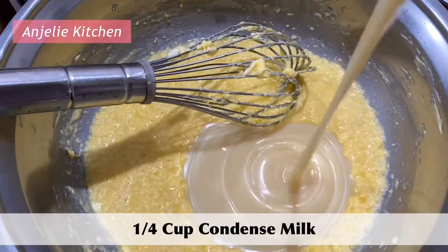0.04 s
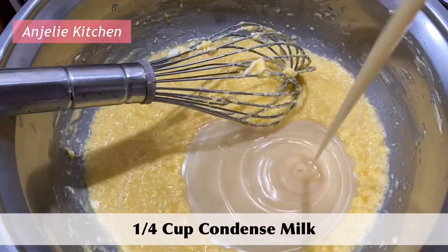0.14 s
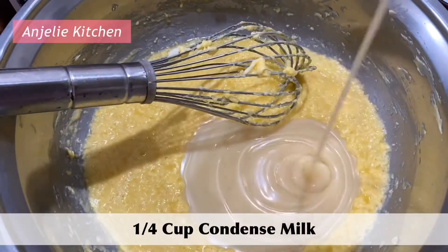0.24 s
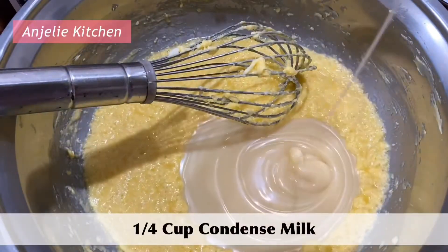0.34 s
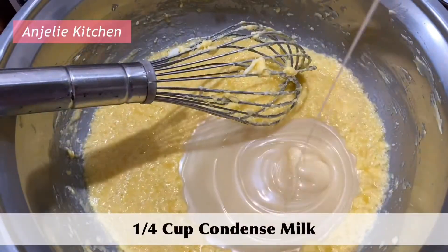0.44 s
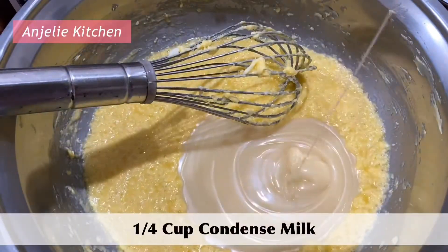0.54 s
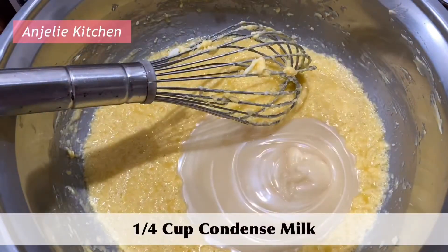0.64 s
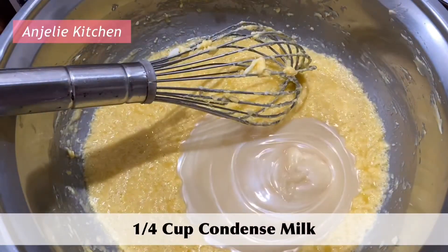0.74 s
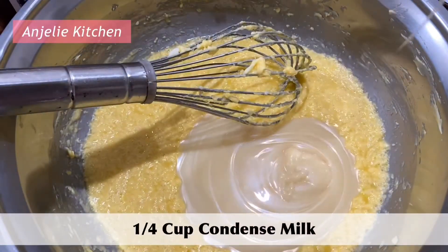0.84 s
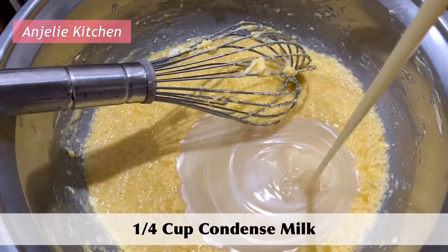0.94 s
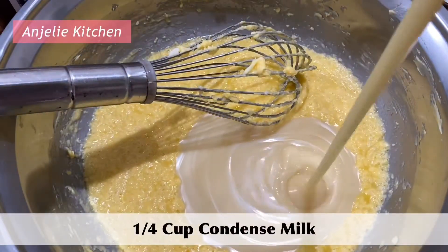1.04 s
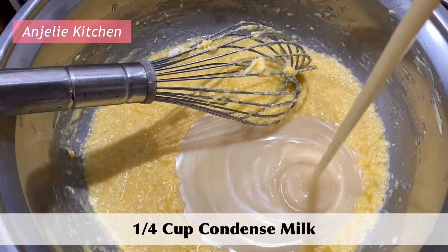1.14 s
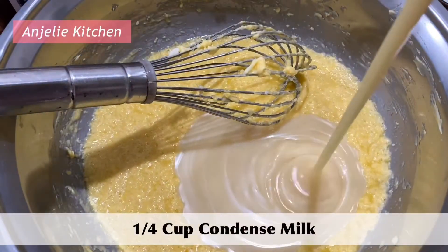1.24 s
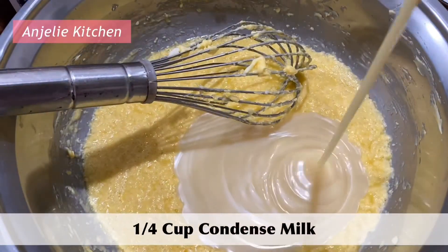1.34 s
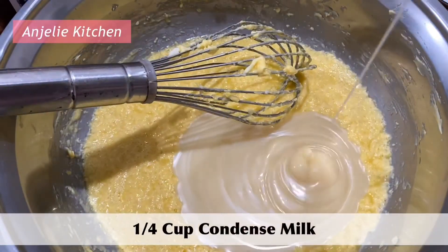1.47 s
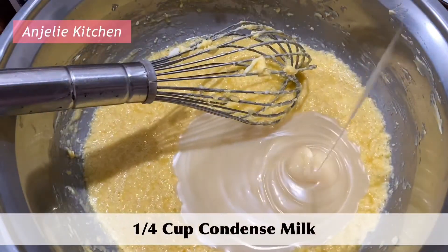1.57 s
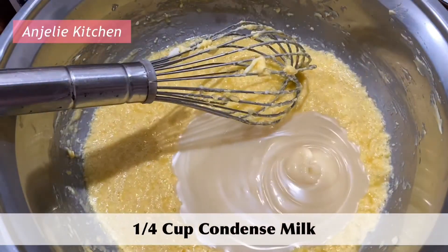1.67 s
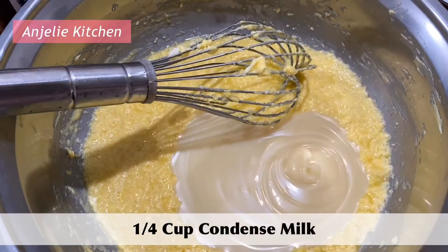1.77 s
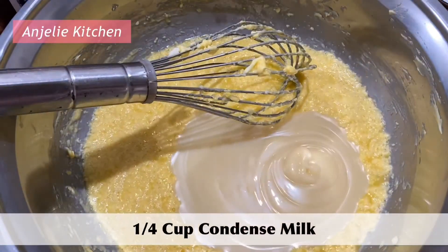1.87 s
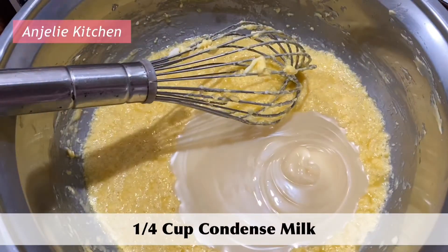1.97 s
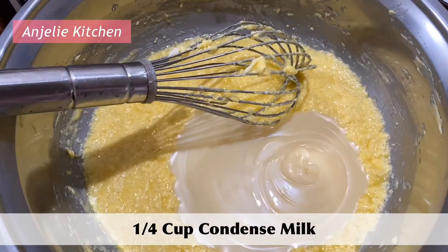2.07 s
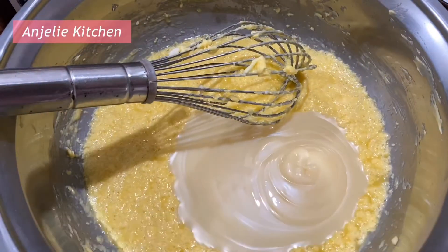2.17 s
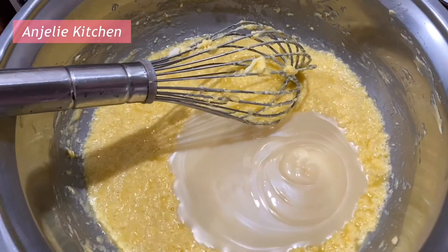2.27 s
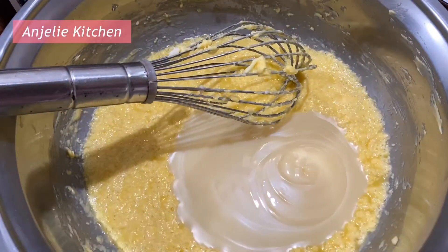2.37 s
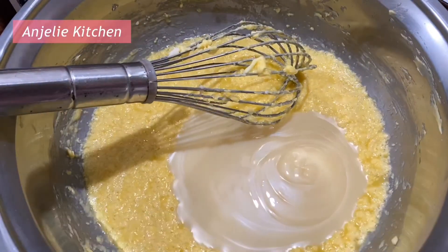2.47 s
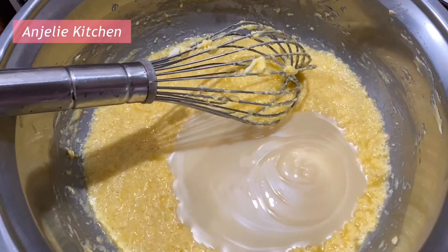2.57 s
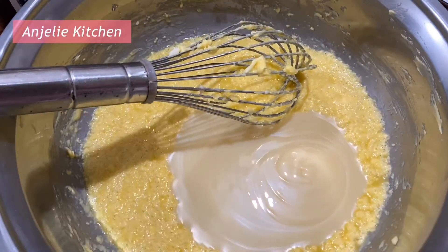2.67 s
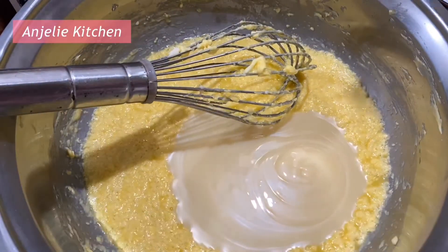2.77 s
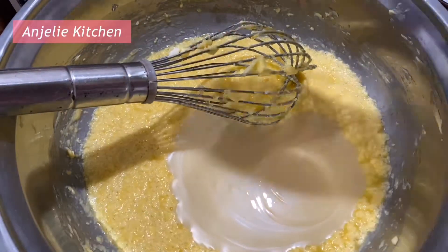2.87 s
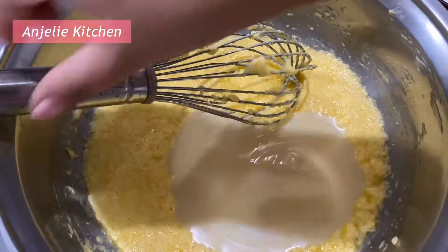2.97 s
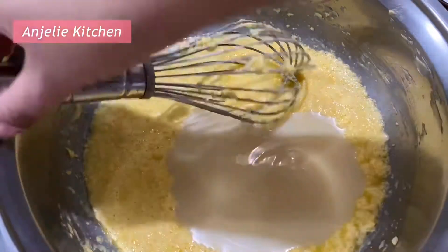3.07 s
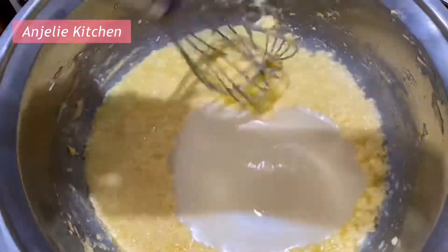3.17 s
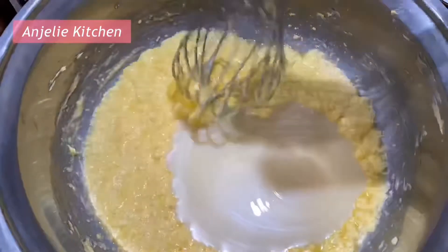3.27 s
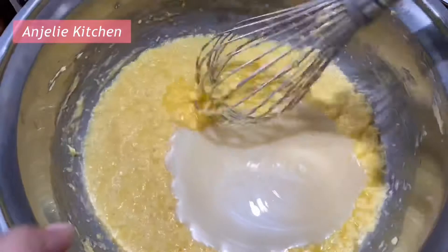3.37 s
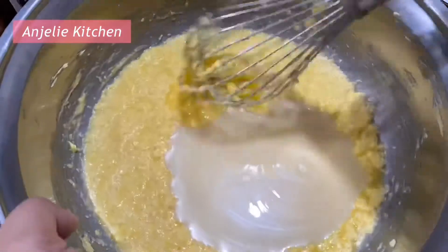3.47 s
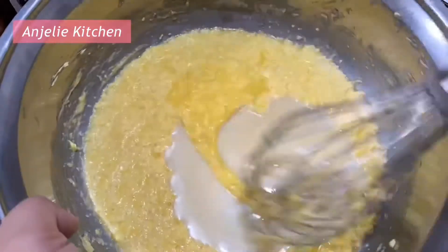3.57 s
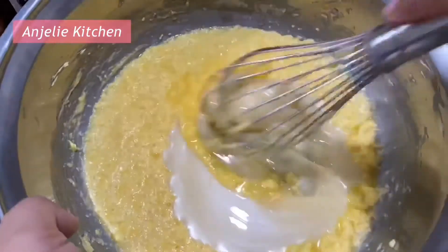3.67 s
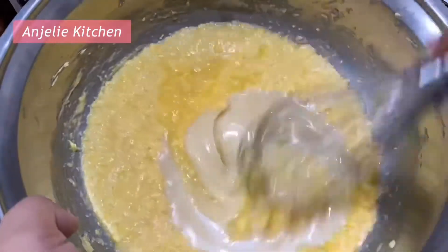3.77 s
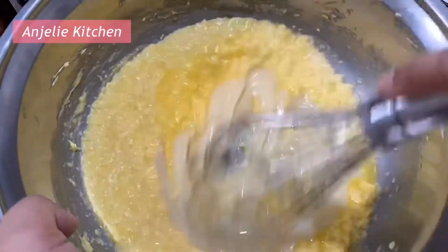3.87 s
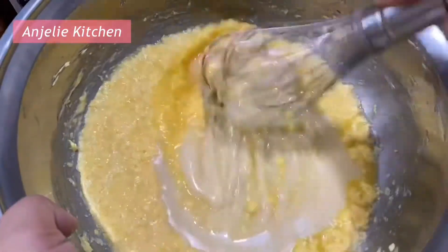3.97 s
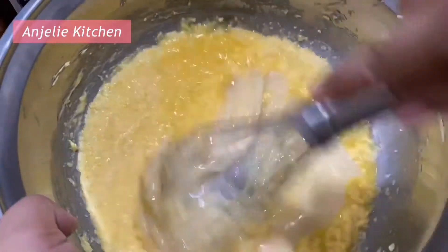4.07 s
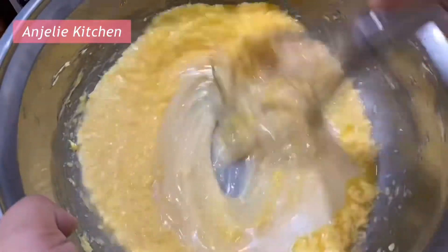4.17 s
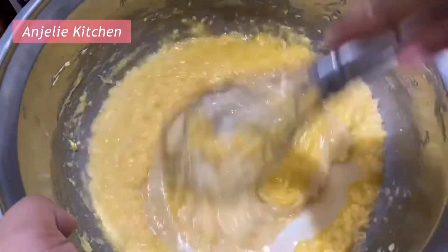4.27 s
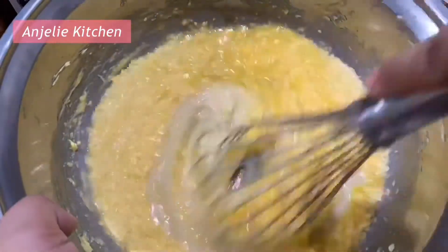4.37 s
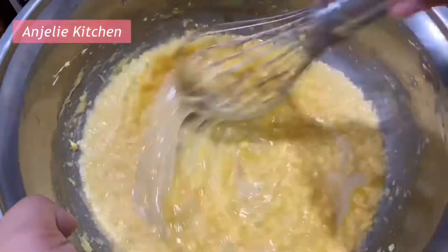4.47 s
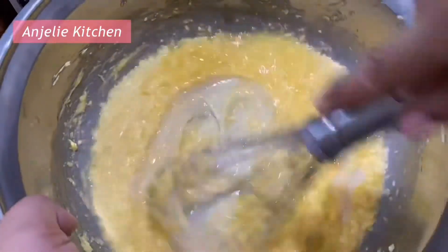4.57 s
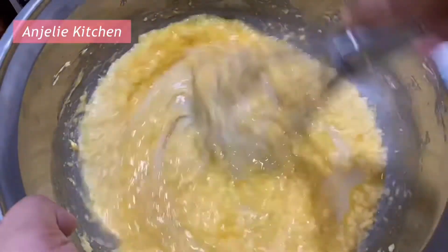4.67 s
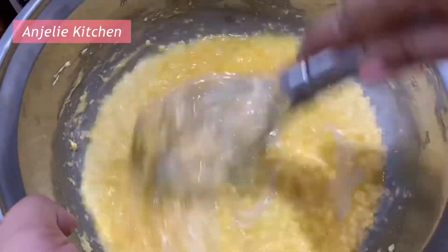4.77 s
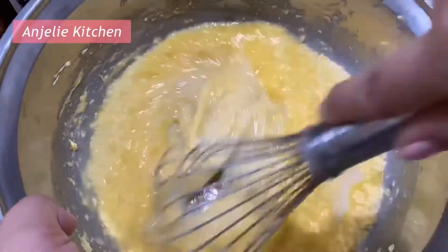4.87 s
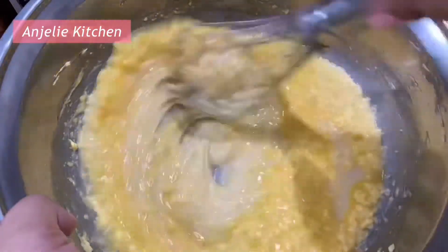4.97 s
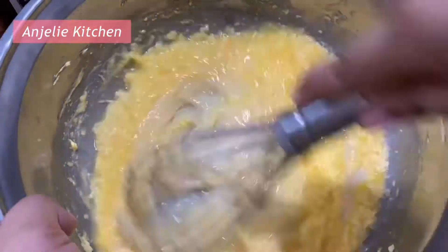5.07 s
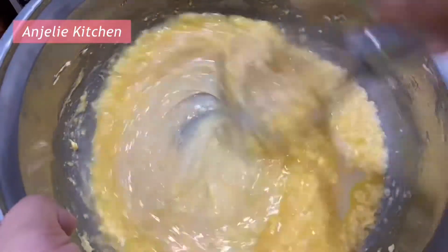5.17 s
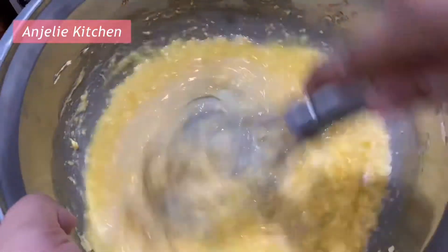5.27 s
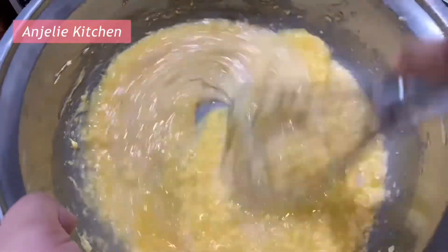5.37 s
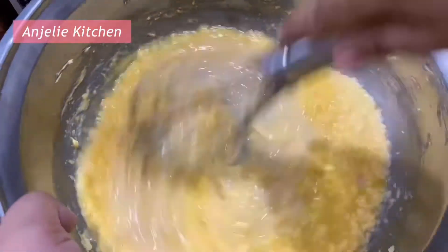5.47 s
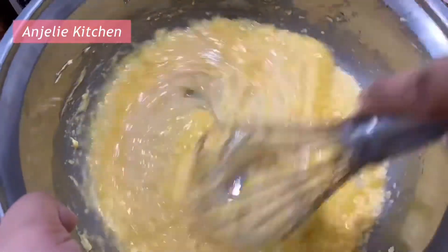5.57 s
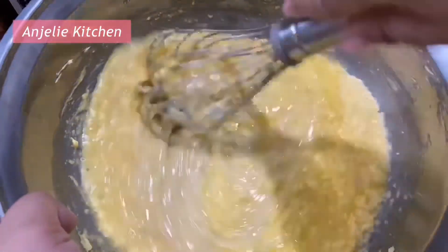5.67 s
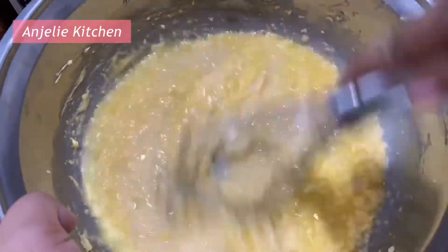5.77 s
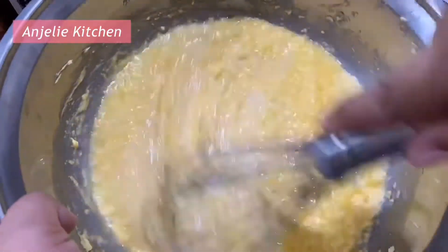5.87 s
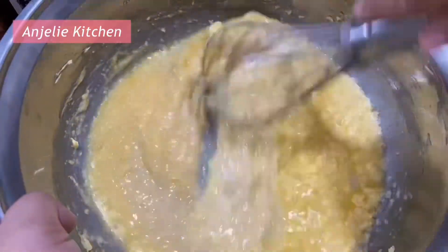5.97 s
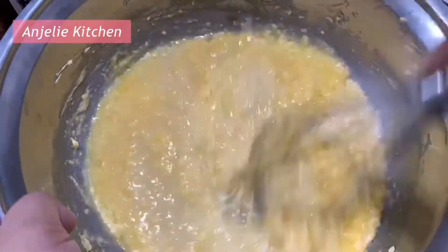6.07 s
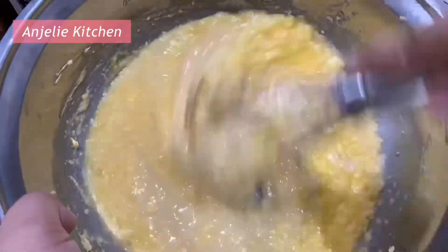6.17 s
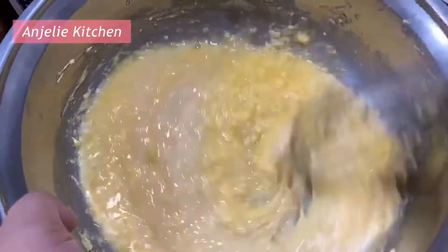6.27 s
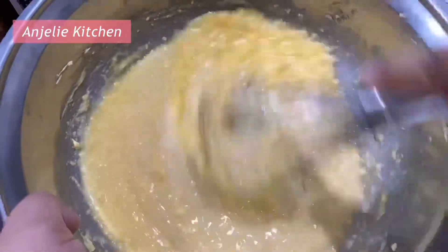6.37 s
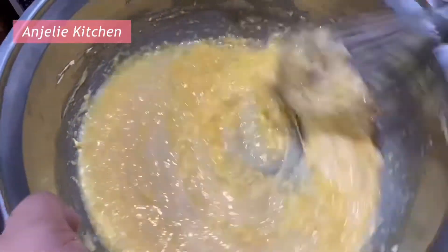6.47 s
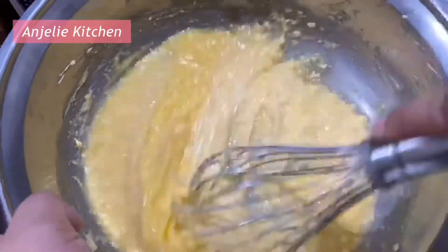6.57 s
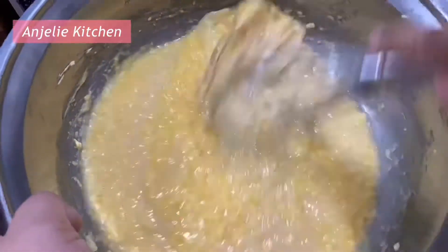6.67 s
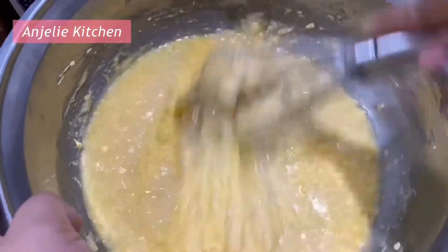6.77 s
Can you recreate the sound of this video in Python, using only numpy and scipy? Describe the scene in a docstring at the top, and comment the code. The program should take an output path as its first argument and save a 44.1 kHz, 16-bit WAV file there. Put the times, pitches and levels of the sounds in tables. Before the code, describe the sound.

After near silence and a soft thump, a whisk is picked up with a faint jangle and beats sloppy batter against ringing metal with quickening clatter.

```python
"""A whisk beats thick batter in a steel mixing bowl: its wires click on the steel as noise snaps through the
bowl's resonances, each push makes the bowl's damped bottom ring as gliding sines, and the batter slops and
crackles as filtered noise and tiny bursts. Before that, things are set down with ticks and low damped modes,
and the whisk is picked up with a jangle of its wire modes. Air noise and an appliance's wavering hum lie beneath."""
import sys
import numpy as np
from scipy import signal
from scipy.fft import rfft, irfft, next_fast_len
from scipy.io import wavfile

SR = 44100
rng = np.random.default_rng(int(sys.argv[2]) if len(sys.argv) > 2 else 0)


def int16_out(signal):
    """Quantize to a 16-bit WAV file."""
    q = np.round(np.clip(np.atleast_2d(signal).T, -1, 1) * 32767)
    wavfile.write(sys.argv[1], SR, q.astype(np.int16))


N = 301203
TIME = np.arange(N) / SR

# Spectrum of the room's air noise: (frequency [Hz], density [dB])
AIR_SPECTRUM = [(20, -30), (38, -30), (68, -9.5), (95, -8.5), (150, -9), (200, -10.5), (249, -12.5),
                (347, -13.5), (484, -21), (1270, -30.5), (2690, -39), (7720, -47.5), (10000, -50.5),
                (15000, -55)]
# Lines of the appliance's hum: (frequency [Hz], level [dB], unsteadiness [share])
HUM_LINES = [(97.1, -57.5, 0.84), (296.7, -68, 0.46)]
# A hand or sleeve brushes past: (time of the middle [s], level [dB], Gaussian spread [s])
BRUSHES = [(0.125, -69.5, 0.046), (1.197, -72.5, 0.057), (1.566, -65, 0.058), (1.755, -62, 0.018),
           (2.224, -72, 0.097), (3.004, -56, 0.022), (3.062, -61, 0.052), (3.344, -56.5, 0.028)]
# Spectrum of the brushing: (frequency [Hz], density [dB])
RUSTLE_SPECTRUM = [(300, -2), (1200, 0), (2500, -4), (5000, -5), (8000, -8.5), (10000, -12.5), (13000, -11),
                   (15500, -21)]
# Light ticks of things being handled: (time [s], level before gain [dB], treble over mids before scaling [dB])
TICKS = [(0.483, -71, 22), (0.854, -56.5, -16.5), (2.156, -53, -20), (2.214, -54.5, -23),
         (2.9356, -55, -16), (2.957, -53, 21), (3.034, -54.5, -26), (3.087, -55, 24), (3.189, -50, -6),
         (3.202, -56.5, -8), (3.354, -60, 5), (3.458, -55.5, 43)]
# Spectrum of the ticks: (frequency [Hz], density before tilt [dB])
TICK_SPECTRUM = [(100, -15), (500, 6.5), (900, 3), (1400, 1), (2200, 8), (4000, 2.5), (6000, 5.5),
                 (9000, 1.5), (12000, 5), (15000, -9.5)]
# Resonances of the filled bowl: (frequency [Hz], width at half the lift [Hz], lift [dB])
BOWL_MODES = [(205, 86, 4), (344, 28, 5.5), (486.6, 36, 13), (964, 93, 3.5), (1795, 130, 5),
              (3480, 180, 4.5), (4330, 280, 3), (11170, 280, 4.5)]
# Dull bumps on the counter: (time [s], level [dB], pitch [Hz], t60 [s])
COUNTER_BUMPS = [(2.1511, -27, 558, 0.025), (2.1643, -15.5, 179, 0.03), (2.178, -29.5, 380, 0.04),
                 (2.196, -27, 100, 0.022), (3.04, -15, 139, 0.056), (3.1978, -19, 170, 0.036),
                 (2.216, -35.5, 370, 0.044)]
# Spectrum of what rattles on the counter after a bump: (frequency [Hz], density [dB])
RATTLE_SPECTRUM = [(60, -15), (130, 17), (220, 5.5), (330, -4), (420, -3.5), (600, -3), (850, -19.5),
                   (1400, -9), (2200, -22), (5000, -28), (12000, -34)]
# The bowl's rim is jogged: (time [s], level [dB])
RIM_CLINKS = [(2.155, -50), (2.957, -42), (2.974, -47.5), (3.031, -48.5)]
# Modes of the rim: (frequency [Hz], relative level [dB], t60 [s])
RIM_MODES = [(855, 3, 0.078), (1283, 6.5, 0.056), (1505, 7, 0.021), (1740, -3, 0.053), (2557, -18, 0.42)]
# The bare wires jangle as the whisk is lifted: (time [s], level [dB], strongest ringing around [Hz])
WIRE_JANGLES = [(2.933, -39.5, 5200), (2.958, -40, 5000), (2.996, -44, 7500), (3.046, -57, 5400),
                (3.087, -54, 5260), (3.187, -57, 6850)]
# Modes of the wires: (frequency [Hz], relative level [dB])
WIRE_MODES = [(4818, -14), (5157, -11), (5453, -13), (5879, -10), (6800, -7), (7284, -5), (7983, -8),
              (10650, 5)]
# Steady stirring between the strokes: (time [s], crackle level before gain [dB])
STIR_LEVELS = [(3.5, -59), (3.65, -51.5), (3.7, -44), (3.73, -48.5), (4.34, -44.5), (4.69, -46.5),
               (5.76, -44.5), (6.22, -45.5), (6.83, -41.5)]
# The whisk sweeps through the batter: (time [s], squelch level [dB], slop level [dB])
WHISK_STROKES = [(3.514, -50.5, -49.5), (3.814, -46.5, -45), (3.984, -43.5, -46), (4.13, -67, -45),
                 (4.283, -52.5, -42), (4.462, -46.5, -40.5), (4.613, -44.5, -40), (4.767, -40, -40),
                 (4.94, -44.5, -38.5), (5.112, -40.5, -44.5), (5.291, -43.5, -44), (5.477, -41.5, -42),
                 (5.617, -39, -42.5), (5.769, -44.5, -39.5), (5.964, -44.5, -44.5), (6.286, -69, -46),
                 (6.452, -65, -41), (6.6, -47, -40.5), (6.747, -41.5, -42)]
# Spectrum of the crackling films: (frequency [Hz], density [dB])
CRACKLE_SPECTRUM = [(250, -3), (450, 6.5), (750, -2), (1100, 5.5), (1500, -1), (2000, 3.5), (2900, -3.5),
                    (4000, -3), (7000, -1.5), (10000, -4.5), (11500, -3), (13500, -0.5), (15000, -49)]
# Spectrum of the slopping mass: (frequency [Hz], density [dB])
SLOP_SPECTRUM = [(60, -35), (120, -3.5), (200, 2), (300, -5.5), (400, -8), (560, -5.5), (750, -18.5),
                 (1100, -18.5), (2000, -25)]
# The wires click on the steel: (time [s], level before gain [dB], treble over mids before scaling [dB],
# step in level from one loop of the whisk to the next [dB])
WIRE_CONTACTS = [(3.546, -38, -5, -10), (3.625, -35.5, -1.5, -3.5), (3.747, -38, 16, -2),
                 (3.784, -33.5, 4, -18), (3.82, -35.5, 10, -4), (3.858, -41.5, -12, 2.5),
                 (3.936, -31, 2, -24), (4.003, -42, 4, 3), (4.03, -36.5, 5, -16), (4.121, -37, 1, -19),
                 (4.164, -43, 0, 0), (4.284, -39, 10, -20), (4.364, -36, 8, -4), (4.445, -33, 1.5, -1.5),
                 (4.613, -34, -4, -8), (4.626, -32, -10, -15), (4.769, -30.5, -9, -20),
                 (4.939, -28.5, -6, -12), (5.128, -32.5, 2, -1.5), (5.151, -36.5, 14, -20),
                 (5.316, -32, -10, -3), (5.476, -33.5, -5, 0), (5.651, -34, -11, -25),
                 (5.678, -32, -7.5, 0.5), (5.815, -32.5, 0.5, -3), (5.832, -30, -12, -2),
                 (5.92, -26, -1, -8.5), (6.036, -48, -20, -25), (6.09, -24.5, -1, -7),
                 (6.117, -24.5, -2.5, -26), (6.288, -29.5, -6, -2.5), (6.35, -34, 5, -7),
                 (6.377, -30.5, -8, -22), (6.419, -35, -4, -1), (6.453, -24.5, -3, -6),
                 (6.508, -31, -4, -0.5), (6.536, -29, -9, -5), (6.578, -32.5, -8, -22),
                 (6.604, -23.5, -1.5, -4.5), (6.657, -30, -3.5, 0.5), (6.681, -27.5, -6, -7),
                 (6.717, -31.5, 8, -5.5), (6.744, -27.5, -8, -11), (6.796, -30.5, 4, 1),
                 (6.811, -30.5, -7, -5)]
# Spectrum of the wire clicks: (frequency [Hz], density before tilt [dB])
WIRE_SPECTRUM = [(70, -10.5), (200, 1.5), (500, 8), (1000, 3.5), (1500, 1.5), (2300, 3.5), (2900, 2.5),
                 (3700, 3.5), (4600, 4), (5600, -1.5), (7500, -1), (10000, -6), (13000, -1.5), (16000, -46)]
# The whisk pushes on the bowl's bottom: (time of the height [s], level before gain [dB],
# pitch at the height [Hz], half length, where the push is at 1/e [s])
BOTTOM_KNOCKS = [(3.637, -38, 450, 0.0067), (3.795, -30.5, 464, 0.0078), (3.833, -31, 506, 0.0092),
                 (3.949, -30.5, 511, 0.0081), (4.036, -38.5, 467, 0.011), (4.295, -43.5, 450, 0.0068),
                 (4.377, -34.5, 465, 0.0074), (4.465, -31, 486, 0.011), (4.629, -27, 497, 0.012),
                 (4.782, -26.5, 487, 0.0081), (4.945, -36.5, 449, .006), (5.127, -31.5, 487.4, 0.012),
                 (5.49, -26.5, 478.3, 0.011), (5.683, -24, 562, 0.0045), (5.701, -29.5, 474, 0.0087),
                 (5.834, -24.5, 506, .006), (5.854, -25.5, 513.6, 0.0078), (5.931, -26.5, 496, .005),
                 (6.101, -27.5, 474.3, 0.0084), (6.257, -29, 397, 0.0039), (6.3, -28, 493, 0.011),
                 (6.43, -24, 453.5, 0.0038), (6.465, -25.5, 458, 0.0077), (6.517, -32.5, 576, .005),
                 (6.546, -30.5, 476.5, .006), (6.583, -33, 449, 0.0038), (6.617, -19.5, 520, 0.0044),
                 (6.666, -23, 494, 0.011), (6.721, -25, 435, 0.0021), (6.753, -21, 493, 0.0079),
                 (6.806, -31, 463, 0.016)]
# Soft wet lumps of batter land: (time of the middle [s], level before gain [dB], pitch [Hz])
BATTER_FLOPS = [(3.636, -32, 265), (3.794, -35, 228), (3.87, -35, 326), (4.09, -30.5, 222),
                (4.132, -32, 213), (4.297, -27.5, 223), (4.416, -32.5, 208), (4.459, -27, 199),
                (4.633, -48, 218), (4.782, -34.5, 244), (4.95, -35, 229), (5.138, -40, 203),
                (5.196, -30, 216), (5.266, -32, 230), (5.321, -30, 210), (5.786, -32, 277)]
# Air pockets burst in the batter: (time [s], level [dB], pitch [Hz])
AIR_POPS = [(5.15, -20, 1320), (5.335, -23, 1500), (5.651, -21, 1710), (6.526, -25, 1810)]
# Level of left over right: (frequency [Hz], difference [dB])
LEFT_LEAN = [(100, -1), (300, 0), (700, -3), (1300, 2.5), (8000, 3.0), (14000, -0.2)]
# Phase by which the left microphone leads: (frequency [Hz], lead [rad])
LEFT_LEAD = [(700, 0.058), (1030, 1.41), (1400, 1.27), (3900, 1.24), (8000, 0.72), (12500, 1.48)]

AIR_DB, CUTOFF_HZ = -63, 15800
FIRST_SWEEP_S, SWEEP_SHRINK_PER_S = 0.078, 0.099  # a later sweep dies away sooner
LEAST_WIRE_GAP_S, WIRE_GAP_SPREAD_S = 0.00532, 0.0028  # the loops of the whisk land one after another
KNOCK_GLIDE_HZ = 28.08  # rise of the note in each half length before the height of a push, as the steel tightens


def amp(db):
    """Level law: decibels to amplitude gain."""
    return 10 ** (np.asarray(db) / 20)


def unit(x):
    """Normalisation: scales to rms 1."""
    return x / np.sqrt(np.mean(x ** 2) + 1e-20)


def read(points, hz):
    """Interpolation of a spectrum along a log-frequency axis."""
    f, value = np.transpose(points)
    return np.interp(np.log(hz + 1), np.log(f + 1), value)


def add(mix, s, sound):
    """Superposition: mixes a sound in at s seconds."""
    part = mix[..., max(round(s * SR), 0):][..., :sound.shape[-1]]
    part += sound[..., :part.shape[-1]]


def colour(x, points, modes=(), tilt_db=0, size=4096):
    """Minimum-phase filter of energy 1: a spectrum, resonances, and a tilt in dB an octave above 1 kHz."""
    hz = np.fft.rfftfreq(size, 1 / SR)
    db = read(points, hz) + tilt_db * np.log2(np.maximum(hz, 1000) / 1000)
    for f, width, lift in modes:
        db = db + lift / (1 + (2 * (hz - f) / width) ** 2)
    # the phase of a causal filter is the Hilbert transform of its log gain
    log_gain = np.log(amp(np.r_[db, db[-2:0:-1]]))
    taps = np.fft.ifft(np.exp(signal.hilbert(log_gain).conj())).real
    taps /= np.linalg.norm(taps)
    return signal.oaconvolve(x, taps[None], axes=1)[:, :x.shape[1]]


def drift(rate_hz, size=8192):
    """Random fluctuation of rms 1, low-passed to the given rate."""
    hz = np.fft.rfftfreq(size, TIME[-1] / size)
    slow = irfft(rfft(rng.standard_normal(size)) * np.exp(-(hz / rate_hz) ** 2))
    return unit(np.interp(TIME, np.linspace(0, TIME[-1], size), slow))


def pair(size, apart):
    """Partly coherent noise at two microphones; apart is the weight of what they do not share."""
    return unit(rng.standard_normal(size) + apart * rng.standard_normal((2, size)))


def wander(x, depth_db, rate_hz, count=10):
    """Time-varying spectrum: each of the overlapping bands swells and fades on its own."""
    size = next_fast_len(N, True)
    band = np.sqrt(2 * np.fft.rfftfreq(size)) * (count - 1)
    spectrum = rfft(x, size)
    out = 0
    for k in range(count):
        part = irfft(spectrum * np.maximum(1 - abs(band - k), 0), size)[:, :N]
        out = out + part * amp(depth_db * drift(rate_hz))
    return out


def damped(hz, t60, rise, size=14000):
    """Free damped vibration: one exponentially dying mode with a soft start."""
    t = np.arange(size) / SR
    return np.sin(2 * np.pi * hz * t) * amp(-60 * t / t60) * (1 - np.exp(-t / rise))


def cracks(per_s=140, spread_db=6.5):
    """Poisson impulses: separate short noise bursts of scattered strength."""
    strength = amp(spread_db * np.minimum(rng.exponential(size=N), 3))
    hits = (rng.random(N) < per_s / SR) * strength
    burst = signal.oaconvolve(hits, np.exp(-np.arange(200) / 22))[:N]  # decay in samples
    return unit(burst * pair(N, apart=1.22))


def kitchen():
    """Stationary background: resonant air noise, and hum lines modulated in amplitude and phase."""
    hum = 0
    for hz, db, unsteady in HUM_LINES:
        wobble = 1 + unsteady * (drift(6.7) + 1j * drift(25)) / np.sqrt(2)
        hum = hum + amp(db) * np.sqrt(2) * (wobble * np.exp(2j * np.pi * hz * TIME)).real
    air = colour(pair(N, apart=0.63), AIR_SPECTRUM, modes=[(1250, 55, 7.2), (7730, 560, 6.7)])
    return hum + amp(AIR_DB) * unit(air)


def handling():
    """Sliding friction: faint uneven swishes of noise, grainy with tiny slips."""
    swish = 0
    for s, db, spread in BRUSHES:
        swish = swish + amp(db) * np.exp(-((TIME - s) / spread) ** 2 / 2)
    grain = pair(N, apart=7.1) * amp(2.0 * drift(70)) + 0.56 * cracks()
    grain = wander(grain, depth_db=2.5, rate_hz=16)
    return swish * unit(colour(grain, RUSTLE_SPECTRUM))


def clicks(rows, spectrum, level_db, rise, snap_t60, ring_t60, ring_db, neutral_db, tilt_share, lift_db,
           count, size=5000):
    """Impact excitation: snaps with a short dense ring; hard contacts are brighter, each spot has its own modes."""
    out, t = np.zeros((2, N)), np.arange(size) / SR
    for s, db, treble_db, next_db in rows:
        run = np.zeros((2, size))
        for k in range(count):
            snap = pair(size, apart=0.42) * amp(-60 * t / snap_t60)
            ring = pair(size, apart=0.88) * amp(ring_db - 60 * t / ring_t60)
            onset = (1 - np.exp(-t / rise)) ** 2
            gap = LEAST_WIRE_GAP_S + WIRE_GAP_SPREAD_S * rng.random()
            add(run, k * gap, amp(k * next_db) * (snap + ring) * onset)
        # the place of the contact favours some of the steel's modes and misses others
        places = np.geomspace(1050, 13000, 20) * np.exp(.06 * rng.standard_normal(20))
        spot = [(hz, 200 + hz / 40, lift_db * (-1) ** k) for k, hz in enumerate(places)]
        tilt_db = tilt_share * (treble_db - neutral_db)
        add(out, s - rise, amp(db + level_db) * colour(run, spectrum, BOWL_MODES + spot, tilt_db))
    return out


def taps():
    """Single light impacts: one snap for each tick."""
    return clicks([(*row, 0) for row in TICKS], TICK_SPECTRUM, level_db=18.0, rise=0.00024, snap_t60=0.0077,
                  ring_t60=0.19, ring_db=-24.5, neutral_db=-2.0, tilt_share=0.31, lift_db=3, count=1)


def bumps(rattle_db=-19, rattle_t60=0.11, size=14000):
    """Modal response of the counter to a blow: two damped modes and a decaying rattle."""
    out, t = np.zeros(N), np.arange(size) / SR
    for s, db, hz, t60 in COUNTER_BUMPS:
        board = damped(hz, t60, rise=0.0042)
        counter = amp(-18.5) * damped(96.6, t60=0.15, rise=0.0081)
        # whatever stands on the counter shudders briefly
        shaking = rng.standard_normal((1, size)) * amp(-60 * t / rattle_t60)
        shudder = colour(shaking, RATTLE_SPECTRUM)[0]
        add(out, s, amp(db) * (board + counter + amp(rattle_db) * shudder))
    return out


def clinks():
    """Modal superposition: the jogged rim rings in its damped modes."""
    out = np.zeros(N)
    for s, db in RIM_CLINKS:
        for hz, mode_db, t60 in RIM_MODES:
            add(out, s, amp(db + mode_db) * damped(hz, t60, rise=0.00081))
    return out


def jangles(t60=0.07, octaves=0.32):
    """Free vibration of the wires while no batter damps them, strongest near one frequency."""
    out = np.zeros(N)
    for s, db, centre in WIRE_JANGLES:
        for hz, mode_db in WIRE_MODES:
            nearness = 1 / (1 + (np.log2(hz / centre) / octaves) ** 2)
            add(out, s, amp(db + mode_db) * nearness * damped(hz, t60, rise=0.00054))
    return out


def bubbles(per_s=2200, spread_db=0.5, cycles=6, count=26):
    """Bubble resonance: tiny air cells burst, each a few cycles at the pitch of its size."""
    out, t = np.zeros((2, N)), np.arange(600) / SR
    number = int(per_s * N / SR / count)
    for hz in np.linspace(800, 14000, count):
        at = rng.integers(0, N, size=number)
        chance, place = rng.random((2, number))
        strength = amp(spread_db * np.minimum(-np.log(chance), 5))
        bursts = np.zeros((2, N))
        # each cell has its own weights at the two microphones
        bursts[:, at] = strength * np.array([np.cos(2.5 * place - .5), np.sin(4.0 * place - .5)])
        cell = unit(np.sin(2 * np.pi * hz * t) * np.exp(-t * hz / cycles - t / 0.0014))
        out += signal.oaconvolve(bursts, cell[None], axes=1)[:, :N]
    return unit(out)


def sweep_length(s):
    """Decay law of a sweep: Gaussian spread in seconds, shorter for a later start s."""
    return FIRST_SWEEP_S * np.exp(-SWEEP_SHRINK_PER_S * (s - WHISK_STROKES[0][0]))


def batter(stir_db=-2.0, stir_slop_db=-4.0, crack_db=1.0, clump_db=2, lump_db=2, rise=0.00061):
    """Film rupture and bulk flow: strokes tear batter into tiny bursts and throw its mass against the bowl."""
    times, db = np.transpose(STIR_LEVELS)
    stir = amp(np.interp(TIME, times, db, left=-120))
    # powers of the two motions add
    tear, heave = (stir * amp(stir_db)) ** 2, (stir * amp(stir_slop_db)) ** 2
    t = np.arange(SR // 2) / SR
    for s, squelch_db, slop_db in WHISK_STROKES:
        plunge = (1 - np.exp(-t / rise)) * np.exp(-(t / sweep_length(s)) ** 2 / 2)
        add(tear, s, (amp(squelch_db) * plunge) ** 2)
        add(heave, s, (amp(slop_db) * plunge) ** 2)
    fizz = (bubbles() + pair(N, apart=0.42)) * amp(clump_db * drift(74))
    # strands of batter part from the wires with separate sharp cracks
    films = wander(fizz + amp(crack_db) * cracks(), depth_db=3.5, rate_hz=26.0, count=20)
    mass = pair(N, apart=0.02) * amp(lump_db * drift(57))
    crackle = np.sqrt(tear) * unit(colour(films, CRACKLE_SPECTRUM, BOWL_MODES))
    slop = np.sqrt(heave) * unit(colour(mass, SLOP_SPECTRUM, BOWL_MODES))
    return crackle + slop


def smacks(low_hz=650, high_hz=2300, t60=0.008, reach=2.0, count=12):
    """Cavity resonance: in the wake of each stroke small cavities snap open with short round notes."""
    out = np.zeros(N)
    for s, squelch_db, _ in WHISK_STROKES:
        for when, size, force in rng.random((count, 3)):
            note = damped(low_hz * (high_hz / low_hz) ** size, t60, rise=0.00033, size=2000)
            level = amp(squelch_db - 9.5 + 6 * force)
            add(out, s + when * reach * sweep_length(s), level * note)
    return out


def wires():
    """Repeated impacts: three loops of the whisk strike the steel in turn at each contact."""
    return clicks(WIRE_CONTACTS, WIRE_SPECTRUM, level_db=4.0, rise=.0007, snap_t60=0.021, ring_t60=0.093,
                  ring_db=-17.5, neutral_db=-1.0, tilt_share=0.43, lift_db=2, count=3)


def knocks(level_db=-2.07, ring_t60=0.11, ring_db=-12, thud_db=-9, thud_ratio=0.62, flex_db=-11,
           flex_ratio=1.33, overtone_db=-15, scatter=0.077):
    """Forced, then free vibration: the pushed bottom rings, choked by batter, between a thud and a higher flex."""
    out, lead = np.zeros(N), .04
    t = np.arange(-lead, 3 * lead, 1 / SR)
    lowest_hz = BOWL_MODES[0][0]
    for s, db, hz, length in BOTTOM_KNOCKS:
        push = np.exp(-(t / length) ** 2)
        ring = np.maximum(push, (t > 0) * amp(ring_db - 60 * np.abs(t) / ring_t60))
        # the pitch rises up to the height of the push,
        # then falls towards the bowl's lowest mode as the wires let go
        hold = np.where(t > 0, np.sqrt(push), 1)
        pitch = lowest_hz + (hz - lowest_hz + KNOCK_GLIDE_HZ * t / length) * hold
        turns = np.cumsum(pitch) / SR
        a, b = rng.random(2)
        overtone = amp(overtone_db) * np.sin(2 * np.pi * (2 * turns + b))
        tone = ring * (np.sin(2 * np.pi * (turns + a)) + overtone)
        for ratio, side_db in (thud_ratio, thud_db), (flex_ratio, flex_db):
            side_turns = ratio * np.exp(scatter * rng.standard_normal()) * turns
            tone = tone + amp(side_db) * push * np.sin(2 * np.pi * (side_turns + rng.random()))
        add(out, s - lead, amp(db + level_db) * tone)
    return out


def flops(level_db=-3.5, length=0.0077, upper_db=-5, upper_ratio=1.57):
    """Heavily damped impact of a soft lump: a few swelling cycles of a low note and the mode above it."""
    out, t = np.zeros(N), np.arange(-1500, 1500) / SR
    swell = np.exp(-(t / length) ** 2)
    for s, db, hz in BATTER_FLOPS:
        low = np.sin(2 * np.pi * (hz * t + rng.random()))
        high = np.sin(2 * np.pi * (upper_ratio * hz * t + rng.random()))
        add(out, s + t[0], amp(db + level_db) * swell * (low + amp(upper_db) * high))
    return out


def pops():
    """Bubble resonance: a bursting air pocket is one strongly damped note."""
    out = np.zeros(N)
    for s, db, hz in AIR_POPS:
        add(out, s, amp(db) * damped(hz, t60=0.011, rise=0.00018))
    return out


def echoes(x, t60, wet_db, size=16000):
    """Diffuse reverberation: adds dense dying reflections, different for each ear."""
    t = np.arange(size) / SR
    tail = rng.standard_normal((2, size)) * amp(-60 * t / t60) * (t > .0006)
    tail /= np.linalg.norm(tail, axis=1, keepdims=True)
    return x + amp(wet_db) * signal.oaconvolve(x, tail, axes=1)[:, :N]


def scene():
    """Superposition of close sources with a short echo, then level and phase differences between the ears."""
    set_down = taps() + bumps() + clinks() + jangles()
    beating = batter() + smacks() + wires() + knocks() + flops() + pops()
    near = echoes(set_down + beating, t60=0.068, wet_db=-10.0)
    hz = np.fft.rfftfreq(N, 1 / SR)
    # half of each difference goes to either side
    left = amp(read(LEFT_LEAN, hz) / 2) * np.exp(.5j * read(LEFT_LEAD, hz))
    return irfft(rfft(near + handling() + kitchen()) * np.array([left, 1 / left]), N)


def record(dry):
    """Band limitation: the microphone's bass cut at 55 Hz and a linear-phase treble limit."""
    thinned = signal.sosfilt(signal.butter(2, 55, "highpass", fs=SR, output="sos"), dry)
    treble_limit = signal.firwin(511, CUTOFF_HZ, window=("kaiser", 9), fs=SR)
    return signal.oaconvolve(thinned, treble_limit[None], "same")


dry = scene()
out = record(dry)
int16_out(out)
```